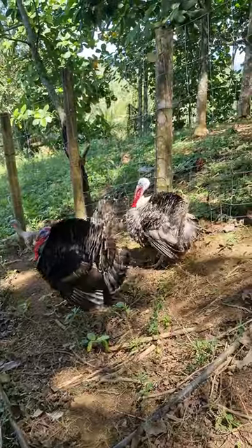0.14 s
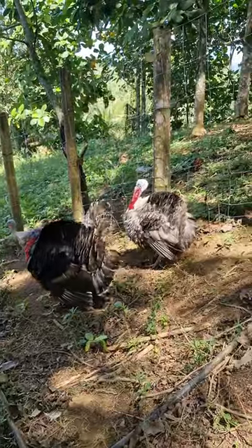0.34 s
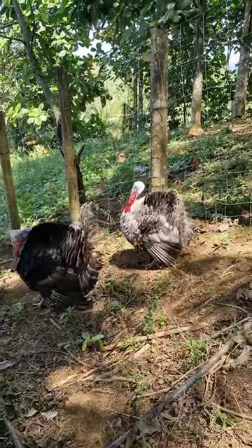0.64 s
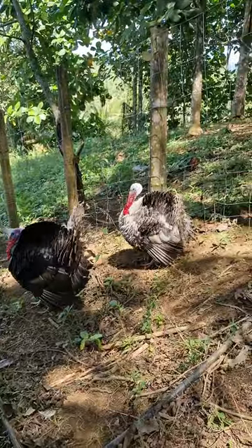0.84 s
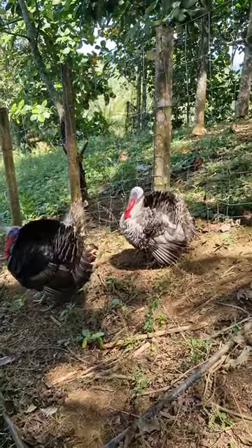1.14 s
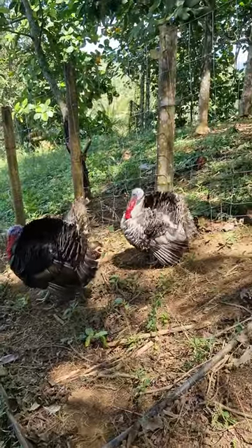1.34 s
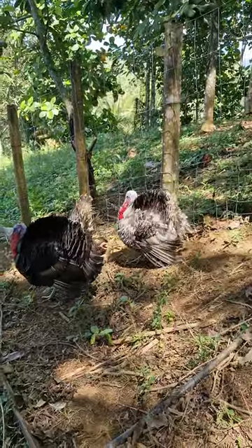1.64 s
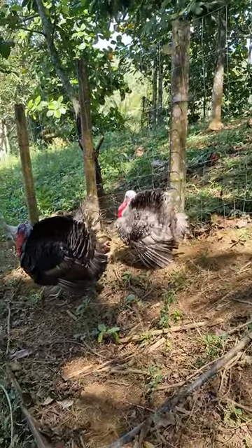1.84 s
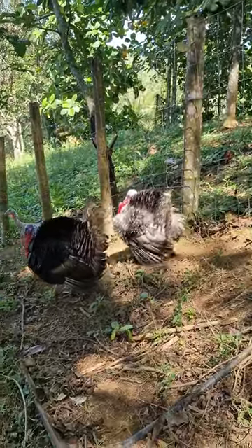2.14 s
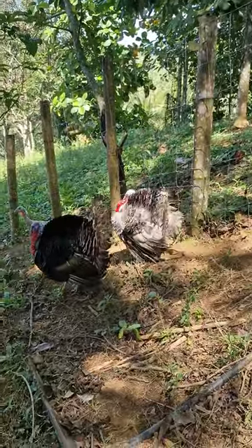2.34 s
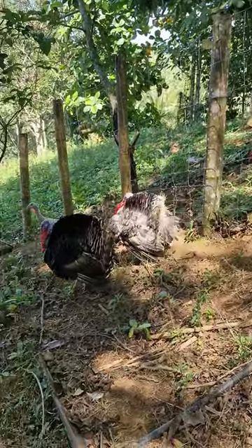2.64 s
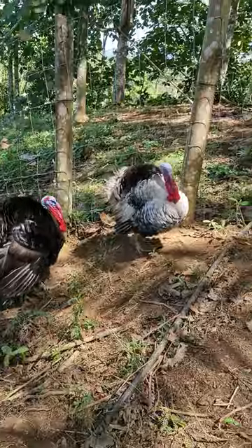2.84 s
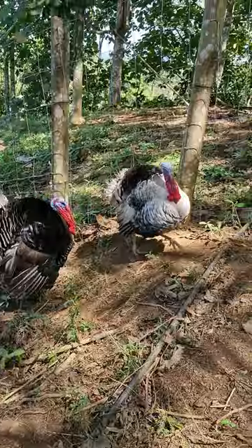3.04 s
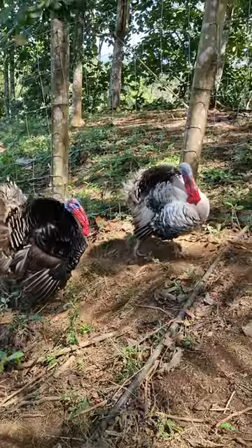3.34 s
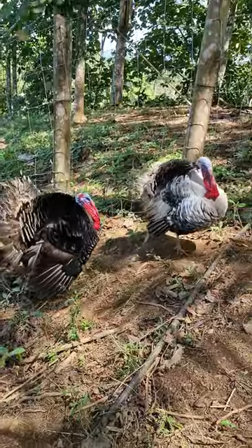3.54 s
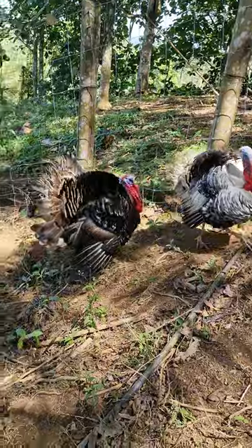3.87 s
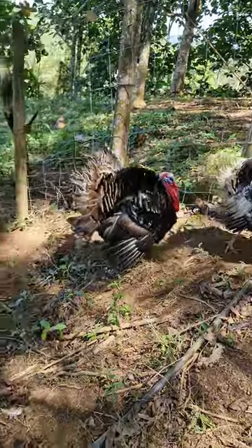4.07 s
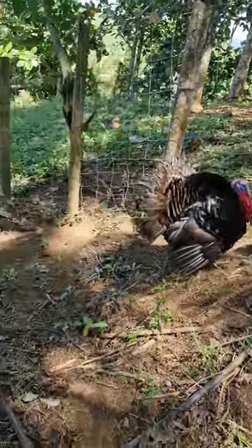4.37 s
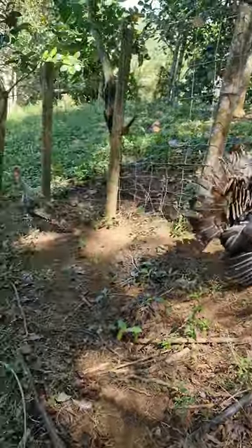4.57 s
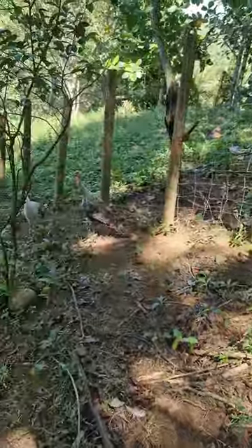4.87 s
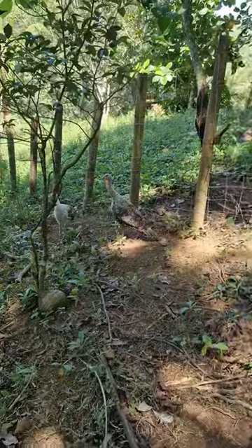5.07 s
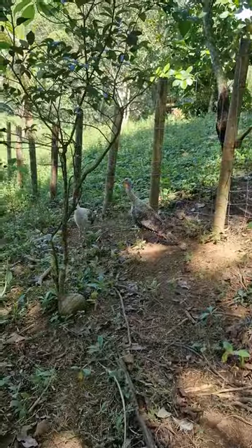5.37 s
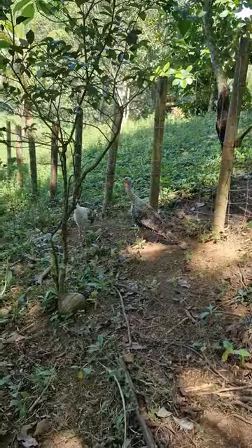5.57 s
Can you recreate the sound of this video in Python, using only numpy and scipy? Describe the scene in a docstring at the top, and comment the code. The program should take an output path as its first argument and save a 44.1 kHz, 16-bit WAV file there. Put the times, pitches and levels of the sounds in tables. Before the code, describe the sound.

Over quiet rumbling outdoor air, large birds rustle and crunch leaves while a goose-like honk blares twice, each ending in a harsh screech.

```python
"""In a wooded farmyard geese honk from the right: slaps ring in windpipe and throat; whole honks end in a screech.
Turkeys strut through dry leaves (crackles and soft thuds), a fowl whines in harmonics, a small bird chirps.
Filtered noise makes the low rumble and hiss; sparse echoes are the trees.
A second honk has just begun when the sound cuts to a quieter moment in the same yard, with one more honk."""
import sys
import numpy as np
from scipy import signal
from scipy.fft import rfft, irfft
from scipy.io import wavfile
from scipy.ndimage import uniform_filter1d, map_coordinates

SR = 44100
rng = np.random.default_rng(int(sys.argv[2]) if len(sys.argv) > 2 else 0)


def output_pcm(signal):
    """Save a mono or channel-first signal as 16-bit PCM at the path in sys.argv[1].

    Samples are clipped to [-1, 1] before scaling.
    """
    pcm = np.clip(np.atleast_2d(signal).T, -1, 1) * 32767
    wavfile.write(sys.argv[1], SR, np.round(pcm).astype(np.int16))


N = 251811
TIME = np.arange(N) / SR
CUT_S = 2.7085


def gain_of(db):
    """Decibels to amplitude."""
    return 10 ** (np.asarray(db) / 20)


def evened(x):
    """Scales to rms 1."""
    return x / np.sqrt(np.mean(x ** 2) + 1e-20)


def read(points, hz):
    """Reads a table along a log-frequency axis."""
    f, value = np.transpose(points)
    return np.interp(np.log(hz + 1), np.log(f + 1), value)


def curves(rows):
    """Sample times of a table, then each of its columns at those times."""
    s, *columns = np.transpose(rows)
    t = np.arange(s[0], s[-1], 1 / SR)
    return [t] + [np.interp(t, s, c) for c in columns]


def add(mix, s, sound):
    """Mixes a sound in at a time."""
    part = mix[max(round(s * SR), 0):][:len(sound)]
    part += sound[:len(part)]


def played(sounds):
    """Lays (time, sound) pairs on one track."""
    track = np.zeros(N)
    for s, sound in sounds:
        add(track, s, sound)
    return track


def wobble(t, per_s):
    """Smooth chance of rms 1, with per_s random knots a second."""
    knots = rng.standard_normal(4000)
    return evened(map_coordinates(knots, [(t - t[0]) * per_s], order=3, mode="wrap"))


def bump(t, at, half):
    """A smooth rise and fall of height 1."""
    return np.exp(-((t - at) / half) ** 2)


def swells(rows, calm_db):
    """Gain of a steady layer with swells on top; their powers add."""
    power = gain_of(calm_db) ** 2
    power = power + sum((gain_of(db) * bump(TIME, s, half)) ** 2 for s, db, half in rows)
    return np.sqrt(power)


def colour(x, points):
    """Causal filter with the given spectrum."""
    log_gain = np.log(gain_of(read(points, abs(np.fft.fftfreq(2048, 1 / SR)))))
    # minimum phase: no sound before the input
    taps = np.fft.ifft(np.exp(np.conj(signal.hilbert(log_gain)))).real
    return signal.oaconvolve(x, taps)[:len(x)]


def resonate(x, hz, width_hz):
    """A resonance of gain 1 that follows the curve hz."""
    turn = np.exp(2j * np.pi * np.cumsum(hz * np.ones(len(x))) / SR)
    r = np.exp(-np.pi * width_hz / SR)
    # shift down to 0 Hz, smooth, shift back
    slow = signal.lfilter([1 - r], [1, -r], x / turn + 1e-18)
    return 2 * (turn * slow).real


def place(x, side, lag_ms, shortcut=0):
    """Two microphones: the left hears later and coloured by side; low tones lag less by shortcut."""
    hz = np.fft.rfftfreq(N + 1, 1 / SR)
    ratio = gain_of(read(side, hz))
    lag_s = lag_ms / 1000 * (1 - shortcut / (1 + (hz / 2200) ** 6))
    ears = np.array([ratio * np.exp(-2j * np.pi * hz * lag_s), np.ones(len(hz))])
    same_power = np.sqrt(2 / (1 + ratio ** 2))
    return irfft(rfft(x, N + 1) * ears * same_power)[:, :N]


# Rumble and hiss spectrum. Each row: frequency in Hz, relative density in dB per Hz.
YARD_SPECTRUM = [(15, -70.5), (25, -11.5), (38, -13), (59, 2.5), (173, -7.5), (209, -20.5), (233, -14.5),
                 (297, -10), (378, -17.5), (469, -34), (1110, -49.5), (1410, -37), (1850, -44),
                 (4040, -24.5), (15500, -43.5)]
# Left-right correlation. Each row: frequency in Hz, likeness -1 to 1.
YARD_LIKENESS = [(100, 0.93), (300, 0.85), (800, 0.01), (2000, .1), (8000, 0.16)]
# Rumble surges. Each row: centre in seconds, peak gain in dB (power added to calm), half-length in seconds.
SURGES = [(.25, 6, 0.97), (.88, 9.5, 0.35), (2.35, -1, .4), (3.28, 2, 0.17), (4.34, 4.5, .06),
          (5.02, 6.5, 0.24), (5.6, 1.5, 0.35)]
YARD_DB, RUMBLE_BELOW_HZ = -57, 190


def yard(calm_db=-1.5, early_db=-2.0, swell_db=0.0):
    """Partly correlated noise: a low rumble that surges, and a smooth hiss that shifts a little at the cut."""
    hz = np.fft.rfftfreq(N + 1, 1 / SR)
    one, other = rfft(rng.standard_normal((2, N + 1)))
    same = np.clip(read(YARD_LIKENESS, hz), -1, 1)
    z = np.array([one, same * one + np.sqrt(1 - same ** 2) * other])
    z = z * gain_of(read(YARD_SPECTRUM, hz)) / np.sqrt(1 + same)
    z /= irfft(z).std()
    low = 1 / (1 + (hz / RUMBLE_BELOW_HZ) ** 6)
    rumble = irfft(z * low)[:, :N] * swells(SURGES, calm_db) * gain_of(swell_db * wobble(TIME, 4))
    hiss = irfft(z * (1 - low))[:, :N] * gain_of(early_db * (TIME < CUT_S))
    return gain_of(YARD_DB) * (rumble + hiss) * gain_of([[-.5], [.5]])


# Scatter colour. Each row: frequency in Hz, level in dB.
TREES = [(170, -17), (700, -6), (1400, -17.5), (2300, -6), (3500, -12), (5300, -3.5), (7000, -12),
         (13000, -7)]
# Scatter decay. Each row: frequency in Hz, time to fall 60 dB in seconds.
TREES_T60 = [(170, 0.37), (1400, 0.57), (5000, 0.45), (13000, 0.25)]
ECHOES_PER_S, FIRST_ECHO_S = 1800, .012


def trees(x):
    """Sparse echoes from trunks and leaves, each band dying at its own speed."""
    taps = rng.standard_normal((2, SR)) * (rng.random((2, SR)) < ECHOES_PER_S / SR)
    taps = taps * (np.arange(SR) > FIRST_ECHO_S * SR)
    hz, t, z = signal.stft(taps, SR, nperseg=256)
    t60 = read(TREES_T60, hz)[:, None]
    same_energy = np.sqrt(2 * np.log(1000) / t60)
    shape = gain_of(read(TREES, hz)[:, None] - 60 * t / t60) * same_energy
    tail = signal.istft(z * shape, SR, nperseg=256)[1] / np.linalg.norm(taps[0])
    return signal.fftconvolve(x[None], tail, axes=1)[:, :N]


def crackle(size, per_s, spread_db):
    """Tiny snaps of very unequal strength over steady noise."""
    chance, strength = rng.random(size), rng.exponential(1, size)
    sign = rng.standard_normal(size)
    snaps = (chance < per_s / SR) * gain_of(spread_db * np.minimum(strength, 4)) * sign
    return evened(snaps + rng.standard_normal(size))


# Feathers and leaves brushing. Each row: centre in seconds, level in dB, half-length in seconds.
BRUSHES = [(.08, -53, 0.35), (.8, -58.5, 0.29), (1.5, -59, 0.078), (2.05, -43.5, 0.051), (2.2, -58.5, 0.28),
           (3.28, -58, 0.058), (5.7, -69, 0.45)]
# Each row: frequency in Hz, level in dB.
RUSTLE_COLOUR = [(150, -9.5), (400, 2), (900, 1), (1600, -4.5), (3000, -4), (4500, 0.5), (7000, -6.5),
                 (8600, 0), (10000, -7.5), (13000, -7.5), (15500, -12)]
EARLY_RUSTLE_DB, LATE_RUSTLE_DB = -62.5, -71.5  # between movements, before and after the cut


def rustle():
    """Dense crackle that swells as the turkeys move."""
    calm_db = np.where(TIME < CUT_S, EARLY_RUSTLE_DB, LATE_RUSTLE_DB)
    level = swells(BRUSHES, calm_db) * gain_of(2.0 * wobble(TIME, 60))
    left, right, shared = [
        evened(colour(crackle(N, per_s=3300, spread_db=3.5), RUSTLE_COLOUR)) for _ in range(3)]
    ears = np.array([left, right]) * gain_of([[-3], [1]])
    middle = place(shared, [(200, 3.5), (2000, -3.5), (13000, -8)], lag_ms=0.074)
    return level * (0.83 * middle + 0.86 * ears)


def crunch(s, db, hz, decay_s):
    """A dry leaf or twig gives way with one snap and a clump of smaller ones."""
    t = np.arange(5000) / SR
    snaps = crackle(len(t), per_s=6600, spread_db=3)
    snaps[0] = 3.5
    leaf = evened(resonate(snaps, hz, width_hz=1840)) + 0.12 * snaps
    return s, gain_of(db) * evened(leaf) * np.exp(-t / decay_s)


# Soft ground. Each row: frequency in Hz, level in dB.
EARTH = [(30, -17), (80, 4), (160, -2.5), (350, -12.5), (950, -12.5), (1600, -27), (4000, -21.5),
         (15000, -36)]


def step(s, db, decay_s):
    """A dull push on soft ground: dark noise with a fast rise and a decay."""
    t = np.arange(8000) / SR
    push = evened(colour(rng.standard_normal(len(t)), EARTH))
    rise = 1.19 * (1 - np.exp(-t / 0.00078))
    return s, gain_of(db) * push * rise * np.exp(-t / decay_s)


SHUFFLE_FROM_S, SHUFFLE_GAP_S, SHUFFLE_DECAY_S = 2.02, .055, 0.025
SHUFFLE_DB, SHUFFLE_FADE_DB_PER_S = -46, 10


def shuffle(count):
    """Small pushes at uneven intervals, slowly weakening."""
    delays_s = SHUFFLE_GAP_S * (np.arange(count) + .5 * (rng.random(count) - .5))
    return [step(SHUFFLE_FROM_S + d, SHUFFLE_DB - SHUFFLE_FADE_DB_PER_S * d, SHUFFLE_DECAY_S)
            for d in delays_s]


# Leaves and twigs. Each row: start in seconds, level in dB, centre in Hz, decay time in seconds.
CRUNCHES = [(1.541, -46.5, 5550, 0.007), (1.634, -52.5, 4670, .004), (1.841, -45.5, 4370, .016),
            (1.857, -45.5, 4930, 0.013), (1.927, -46, 6550, 0.01), (1.971, -43.5, 8400, 0.0075),
            (2.16, -43.5, 3860, 0.0064), (2.249, -43.5, 4250, 0.0047), (2.299, -45.5, 5000, 0.006),
            (2.541, -49, 6030, 0.0089), (2.768, -49.5, 8740, .01), (2.839, -56.5, 3550, 0.0064),
            (2.947, -55, 5830, 0.0098), (3.274, -47.5, 4600, .016), (3.297, -50, 3550, 0.025),
            (3.875, -57, 4950, .013), (3.948, -58, 3310, 0.013), (4.062, -54, 8500, .003),
            (4.167, -58, 7250, 0.015), (4.264, -55.5, 4650, 0.017)]
STEP_S, STEP_DB, STEP_DECAY_S = 2.048, -35, 0.012


def feet():
    """Turkey feet: leaf crunches, one footfall on soft earth and a shuffle."""
    sounds = [crunch(*row) for row in CRUNCHES]
    sounds += [step(STEP_S, STEP_DB, STEP_DECAY_S)] + shuffle(count=9)
    track = played(sounds)
    direct = place(track, [(150, 1.0), (1500, -2.5), (13000, -17.5)], lag_ms=0.045)
    return direct + gain_of(-5) * trees(track)


CHIRP_S, CHIRP_HZ, CHIRP_FALL_HZ_PER_S = 0.12, 6000, 13500  # length, starting pitch, mean fall
THROB_HZ, THROB_HALF_SWING_DB = 36.4, 5


def chirp(s, db):
    """A small bird's whistle falls in steps, one for each throb."""
    t = np.arange(0, CHIRP_S, 1 / SR)
    throb = 2 * np.pi * THROB_HZ * t
    stepped_t = t - np.sin(throb) / (2 * np.pi * THROB_HZ)
    hz = CHIRP_HZ - CHIRP_FALL_HZ_PER_S * stepped_t
    turns = np.cumsum(hz * (1 + .014 * wobble(t, 260))) / SR
    level = gain_of(db + THROB_HALF_SWING_DB * (np.cos(throb) - 1))
    return s, level * np.sin(2 * np.pi * turns) * np.sin(np.pi * t / CHIRP_S)


# Each row: start in seconds, peak level in dB.
CHIRPS = [(2.872, -65), (3.425, -51.5), (4.875, -58), (5.614, -57)]


def bird():
    """Chirps from the middle, with strong scatter."""
    chirps = played(chirp(*row) for row in CHIRPS)
    return chirps + gain_of(3) * trees(chirps)


# Second to sixth harmonic, relative level in dB.
WHINE_OVERTONES = [-2, -15, -12, -21, -21]
SCOOP_S, FLICK_LEAD_S, FLICK_S = .048, 0.024, .013  # lead: before the end; flick: half-length
WHINE_FADE = .24  # both fades together, share of the note


def whine(s, length_s, top_hz, scoop, flick, db, fundamental_db, waver=0.0072):
    """A thin nasal note of six harmonics: it scoops up to its pitch and flicks higher at the end."""
    t = np.arange(0, length_s, 1 / SR)
    bend = 1 - scoop * bump(t, 0, SCOOP_S) + flick * bump(t, length_s - FLICK_LEAD_S, FLICK_S)
    turns = np.cumsum(top_hz * bend * (1 + waver * wobble(t, 120))) / SR
    levels_db = [fundamental_db] + WHINE_OVERTONES
    note = sum(gain_of(level) * np.sin(2 * np.pi * k * turns) for k, level in enumerate(levels_db, 1))
    return s, gain_of(db) * evened(note) * signal.windows.tukey(len(t), WHINE_FADE)


# Each row: start in seconds, length in seconds, pitch in Hz, scoop from below 0-1, closing flick 0-1,
# level in dB, relative fundamental in dB.
WHINES = [(0.236, 0.21, 593.4, 0.02, 0.15, -56.5, -3), (2.08, 0.15, 562, 0, 0.04, -57.5, -5.5),
          (3.121, .14, 684, 0.06, 0, -74, -15), (3.548, .2, 676.4, .19, .07, -59.5, -2.5),
          (4.753, 0.032, 755, 0.02, 0.08, -69, -12)]


def fowl():
    """Soft whines, shaded in the left treble, and their scatter."""
    whines = played(whine(*row) for row in WHINES)
    return place(whines, [(600, 2), (2400, -8)], lag_ms=0.059) + trees(whines)


def windpipe(x, spacing_hz, echo):
    """Each slap runs up and down the long windpipe, weaker each trip; the lowest tones do not ring."""
    size = 2 * len(x)
    hz = np.fft.rfftfreq(size, 1 / SR)
    rings = np.clip(hz / 700 - .8, 0, 1)
    trip = np.clip(echo, 0, .7) * rings * np.exp(-2j * np.pi * hz / spacing_hz)
    return irfft(rfft(x, size) / (1 - trip))[:len(x)]


# The throat opens with pitch. Each row: pitch in Hz, resonance in Hz before the sag.
THROAT = [(120, 1175), (170, 1430)]
THROAT_SAG_HZ_PER_DB = 5.5  # it narrows again as the voice turns brassy
CLEAR_ROUGH = .08  # roughness of the clear voice
SOFT_BRASS_DB, BRIGHT_AT = -17.5, 0.6  # mellow start; fully brassy after this share of the honk
BREAK_S = 0.018  # time to break into the screech
SCREECH_UNDER_DB, SCREECH_DB = -15, 3.5  # against the brass before the break, against the effort after
BREAK_BRASS_DB = -20.5


def voicing(t, hz, hoarse_at_s, hoarse_s, hoarse, full_brass_db, screech_s):
    """The course of a honk: mellow, hoarse for a moment, brassier, and breaking if screech_s is above 0."""
    rough = np.clip(CLEAR_ROUGH + hoarse * bump(t, hoarse_at_s, hoarse_s), 0, 1)
    bright = np.minimum((t - t[0]) / (t[-1] - t[0]) / BRIGHT_AT, 1) ** 2
    brass_db = SOFT_BRASS_DB + (full_brass_db - SOFT_BRASS_DB) * bright
    throat_hz = read(THROAT, hz) - THROAT_SAG_HZ_PER_DB * (brass_db - SOFT_BRASS_DB)
    broken = np.clip((t - t[-1] + screech_s) / BREAK_S, 0, 1)
    screech_db = (1 - broken) * (brass_db + SCREECH_UNDER_DB) + broken * SCREECH_DB
    brass_db = brass_db + broken ** 2 * (BREAK_BRASS_DB - brass_db)
    return rough, throat_hz, brass_db, screech_db, broken


def steady(x):
    """Holds the loudness level, so that effort sets it."""
    return x / np.sqrt(abs(uniform_filter1d(x ** 2, size=1100)) + 1e-12)


# Open throat. Each row: frequency in Hz, level in dB.
BRASS = [(300, -63.5), (900, -14.5), (2000, 6.5), (2500, -7.5), (3000, 5.5), (3450, 4.5), (4200, -0.5),
         (4700, -8), (5900, -28), (6800, -9.5), (9000, -25), (10500, -42.5), (13000, -22), (15500, -39.5)]
# The break that ends a whole honk. Each row: frequency in Hz, level in dB.
SCREECH = [(200, -24), (600, -20), (1500, -7), (2200, -7), (2700, 2), (4200, -3.5), (5300, -3.5),
           (6300, -12), (7300, -2.5), (8400, -3), (10000, -24.5), (13000, -13), (15500, -25.5)]
RASP, BREAK_RASP = .13, .3  # air added to the roughness in the brass and in the screech
UNSTEADY = .002  # least pitch jitter, rms share
BREAK_THROAT_DB, BREAK_DROP_DB = -3, -5.5  # in the break: fade of the throat's ring, loss of effort


def honk(curve, hoarse_at_s, hoarse_s, hoarse, full_brass_db, screech_s, throat_width_hz, horn_hz, horn_db,
         jitter=.07, shimmer=0.79, chest_db=-31, smear=.03, burst=0.62):
    """Membranes slap once a cycle into windpipe and throat; a screech length above 0 ends in a break."""
    t, effort_db, hz = curves(curve)
    rough, throat_hz, brass_db, screech_db, broken = voicing(
        t, hz, hoarse_at_s, hoarse_s, hoarse, full_brass_db, screech_s)
    effort_db = effort_db + BREAK_DROP_DB * broken
    turns = np.cumsum(hz * (1 + (UNSTEADY + jitter * rough) * wobble(t, 250))) / SR - .4
    k = np.arange(1, 100)[:, None]
    # a slap is spread over part of its cycle, and its high harmonics fall out of step
    spread = smear * np.minimum(k, 12) ** 2 + np.minimum(k / 20, 1) * rng.standard_normal(k.shape)
    slaps = evened(np.cos(2 * np.pi * k * turns - spread).sum(0))
    slaps = slaps * (1 + shimmer * rough * wobble(t, 170))
    puffs = evened((0.66 + np.exp(-(turns % 1) / 0.18)) * rng.standard_normal(len(t)))

    def drive(noisy):
        """Slaps blended with puffs of air, through the windpipe."""
        noisy = np.clip(noisy, 0, 1)
        return windpipe(np.sqrt(1 - noisy ** 2) * slaps + noisy * puffs, spacing_hz=342.4, echo=0.36)

    air = drive(.65 * rough)
    throat = steady(resonate(resonate(air, throat_hz, throat_width_hz), throat_hz, throat_width_hz))
    horn = steady(resonate(resonate(air, horn_hz, 260), horn_hz, 260))
    brass = steady(colour(drive(rough + RASP), BRASS))
    bursts = 0.38 + np.exp(-(turns % 1) / burst)
    screech = steady(colour(drive(rough + BREAK_RASP) * bursts, SCREECH))
    voice = gain_of(BREAK_THROAT_DB * broken) * throat + gain_of(horn_db) * horn
    voice = voice + gain_of(brass_db) * brass + gain_of(screech_db) * screech
    # the fundamental radiates from the chest and grows more slowly than the voice; soft honks add its octave
    octave = 0.46 * gain_of(-1.1 * np.maximum(effort_db + 32.0, 0))
    chest = np.sin(2 * np.pi * turns) + octave * np.sin(4 * np.pi * turns)
    chest = gain_of(chest_db + 0.48 * effort_db) * chest
    return t[0], (gain_of(effort_db) * voice + chest) * signal.windows.tukey(len(t), .03)


def nearby(x, level_db=-10.5, decay_s=0.0055):
    """Ground and posts close by smear the treble of each slap over a few milliseconds."""
    t = np.arange(900) / SR
    taps = colour(rng.standard_normal(len(t)), [(1500, -26.0), (3000, -4), (15000, 5.5)])
    taps = taps * np.exp(-t / decay_s)
    return x + gain_of(level_db) * signal.oaconvolve(x, taps / np.linalg.norm(taps))[:N]


# Goose calls. Each row: time in seconds, effort in dB before the break, pitch in Hz before jitter.
FIRST_HONK = [(.72, -56.5, 127), (.733, -28.5, 134.6), (.768, -13, 177.9), (.8, -15, 166.6),
              (.835, -12, 170.8), (.87, -17.5, 172.7), (.945, -14, 173.7), (.987, -19.5, 176.6),
              (1, -30, 184.4)]
BROKEN_HONK = [(2.662, -62, 100.8), (2.68, -44, 110.8), (2.685, -34, 109), (2.708, -29, 103.4)]  # stops at the cut
SECOND_HONK = [(4.78, -67, 120.9), (4.808, -45.5, 123.1), (4.88, -40.5, 128), (4.938, -41, 137.8),
               (4.953, -30, 142.3), (5.025, -24.5, 168.7), (5.085, -21.5, 176.9), (5.15, -17.5, 173.7),
               (5.203, -28, 173)]  # after the cut
# Each row: curve, hoarsest time in seconds, half-length of hoarseness in seconds, added roughness 0-1,
# full brassiness in dB, screech length in seconds, throat width in Hz, horn in Hz, horn level in dB.
HONKS = [(FIRST_HONK, .795, .055, .3, -5, .053, 334, 1780, -10.5),
         (BROKEN_HONK, 2.69, .02, .03, -16.5, 0, 340, 1910, -13.5),
         (SECOND_HONK, 5.132, .043, .5, -12.5, 0.049, 293, 1873, -12.5)]
# Tone colour of the honks, before and after the cut. Each row: frequency in Hz, level in dB.
EARLY_COLOUR = [(170, -0.5), (340, -2), (520, 1), (690, -4), (1040, -0.5), (1400, -3), (2100, 3.5),
                (2700, -1), (3500, -2.5), (4300, 0), (5900, 7.5), (7000, -4), (13000, 3.5)]
LATE_COLOUR = [(170, 0.5), (340, 9), (520, 8.5), (700, 3.5), (880, 0), (1400, -4), (1700, 2.5), (2050, 2.5),
               (2800, -3.5), (3550, -1), (6500, 0.5), (8300, -22.5), (11000, 1.5), (13000, -2)]
# Sides, before and after the cut. Each row: frequency in Hz, left minus right in dB.
EARLY_SIDE = [(170, -1), (700, -5), (1300, -4), (2400, 5.5), (3500, -6.5), (5300, -4.5), (8000, -11.5),
              (10000, -0.5), (13000, -21.5)]
LATE_SIDE = [(170, -1), (700, -2), (1300, -5), (2400, -7), (3500, -8), (5300, -7), (10000, -5),
             (13000, -11)]


def geese():
    """Honks from the right with their scatter; colour and side differ before and after the cut."""
    honks = [honk(*row) for row in HONKS]
    early = nearby(colour(played((s, call) for s, call in honks if s < CUT_S), EARLY_COLOUR))
    late = nearby(colour(played((s, call) for s, call in honks if s >= CUT_S), LATE_COLOUR))
    until_cut = np.exp(-np.maximum(TIME - CUT_S, 0) / 0.012)
    before = (place(early, EARLY_SIDE, lag_ms=0.282, shortcut=0.19) + trees(early)) * until_cut
    after = place(late, LATE_SIDE, lag_ms=.22, shortcut=0.08) + gain_of(2.5) * trees(late)
    return before + after


def scene():
    """The yard, leaves and feet, bird and fowl, and the geese to the right."""
    return yard() + rustle() + feet() + bird() + fowl() + geese()


CEILING, EDGE_HZ = .66, 15800


def record(dry):
    """Rounds off the highest peaks below the ceiling, then limits the band."""
    rounded = dry / (1 + (dry / CEILING) ** 6) ** (1 / 6)
    band = signal.firwin(511, EDGE_HZ, window=("kaiser", 9), fs=SR)
    return signal.oaconvolve(rounded, band[None], "same")


dry = scene()
out = record(dry)
output_pcm(out)
```